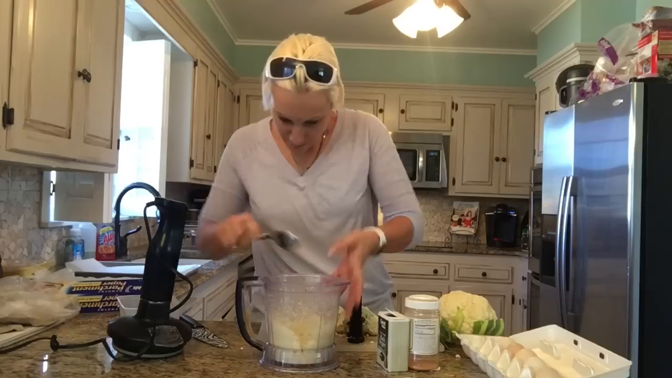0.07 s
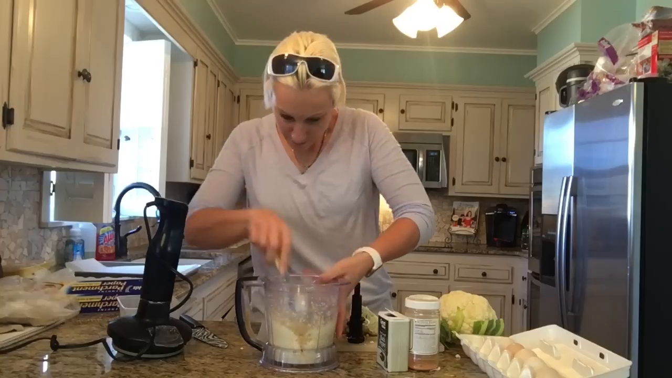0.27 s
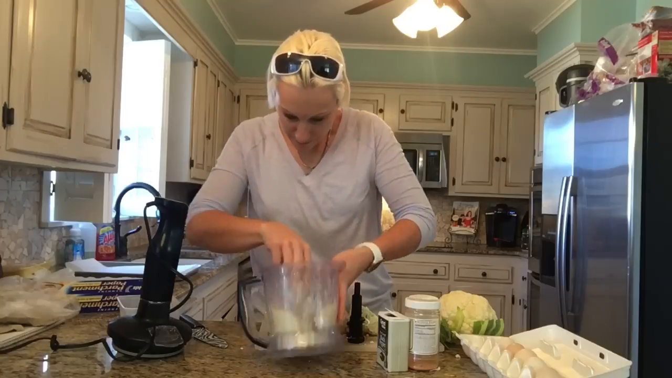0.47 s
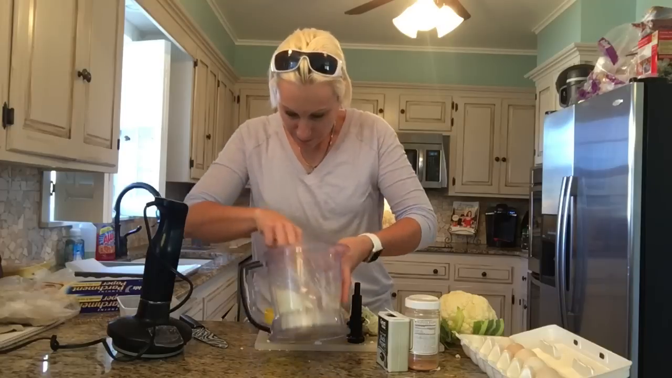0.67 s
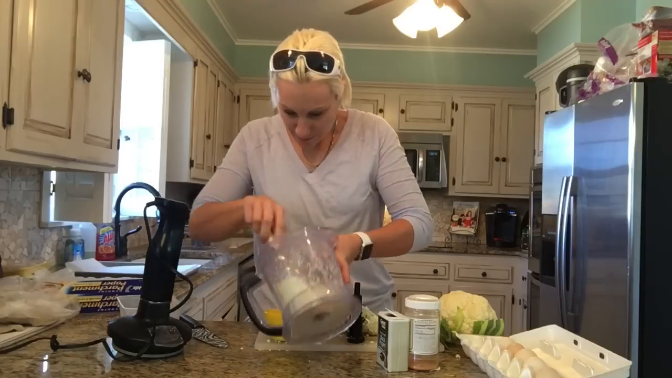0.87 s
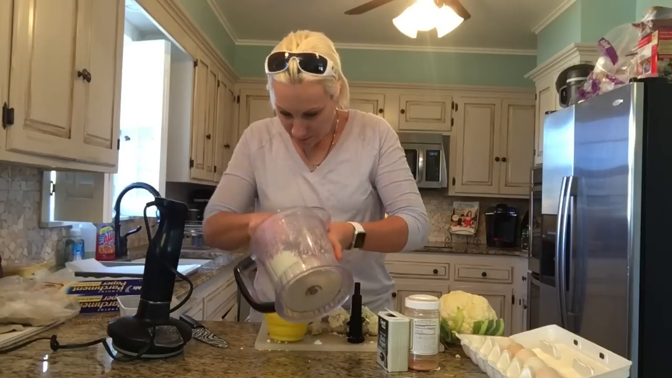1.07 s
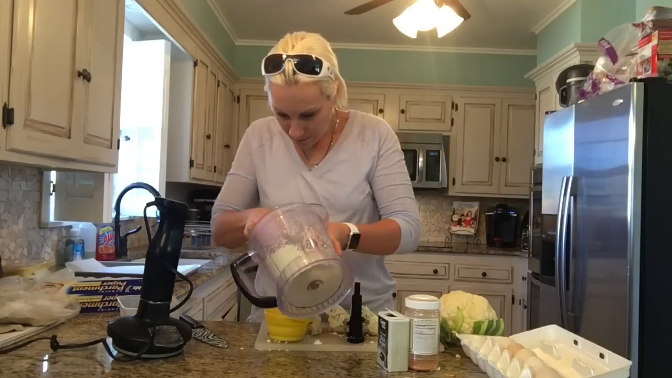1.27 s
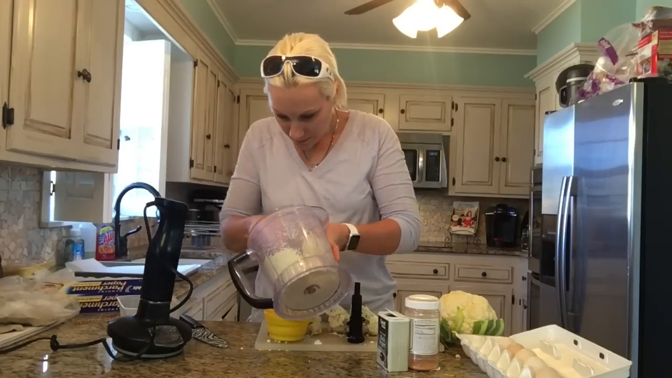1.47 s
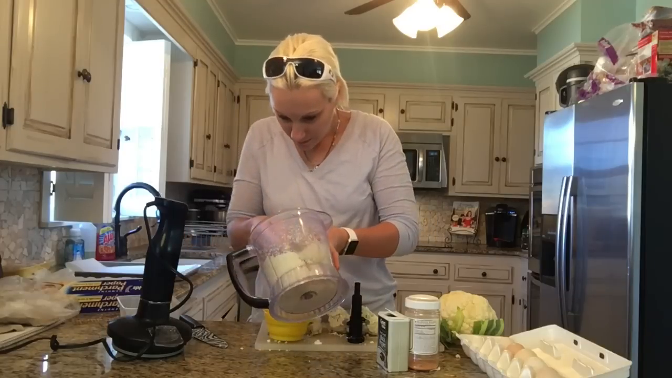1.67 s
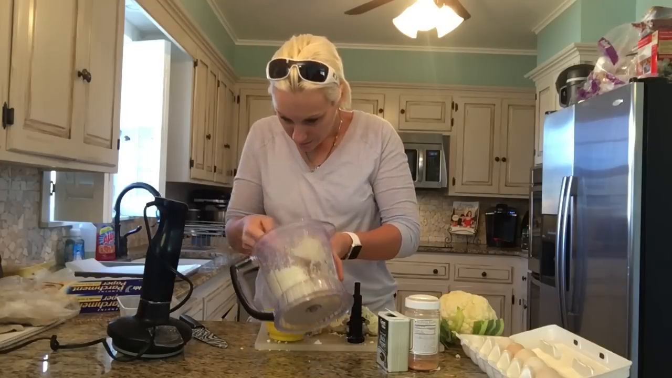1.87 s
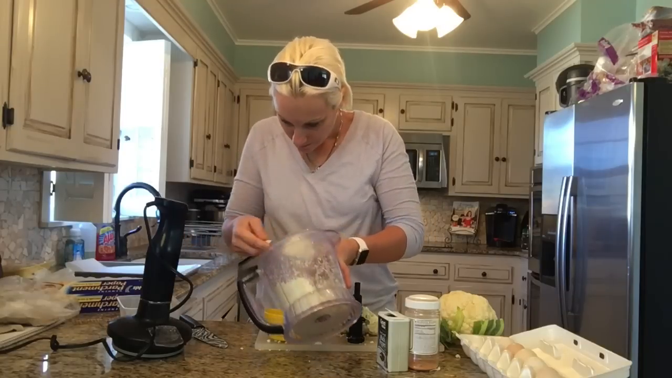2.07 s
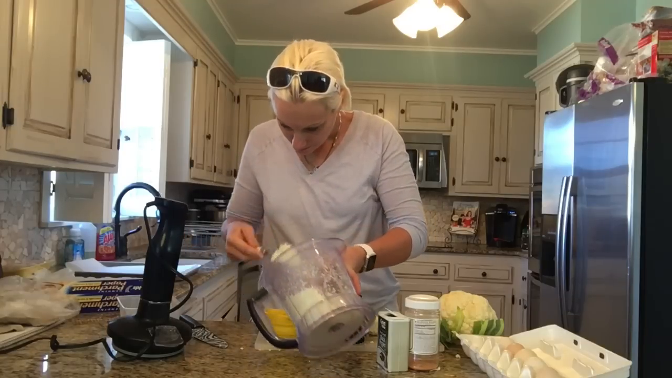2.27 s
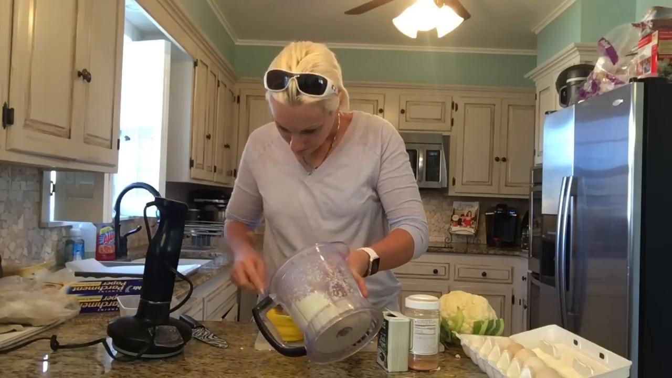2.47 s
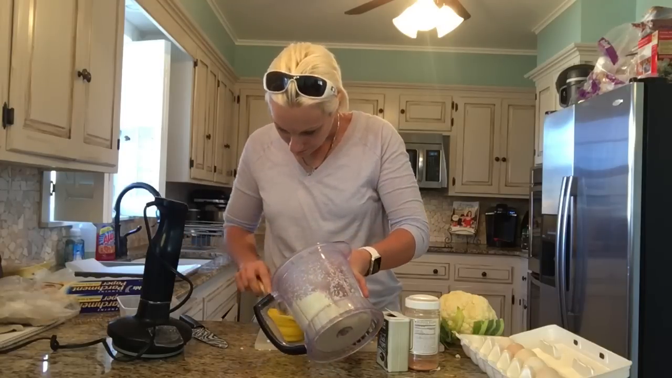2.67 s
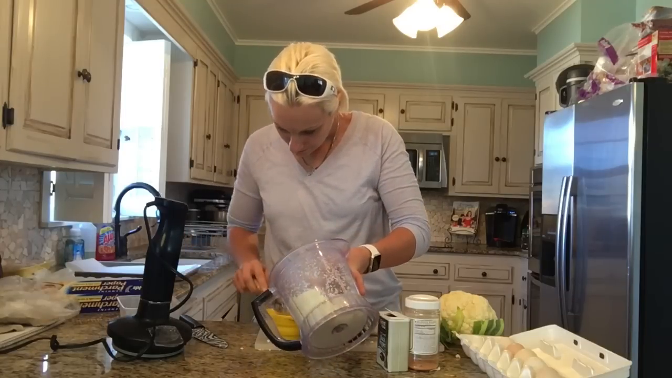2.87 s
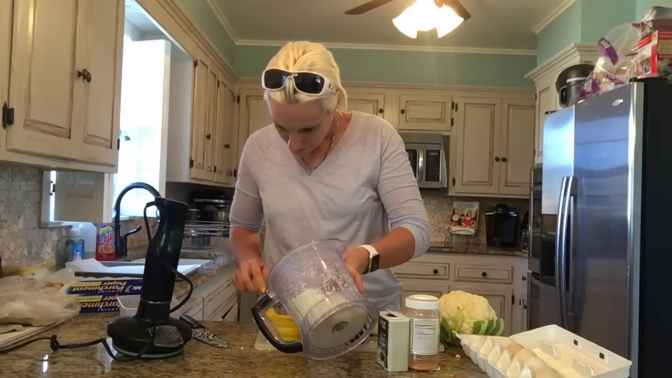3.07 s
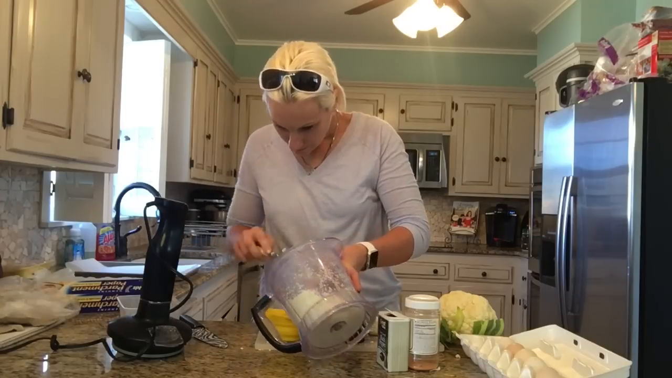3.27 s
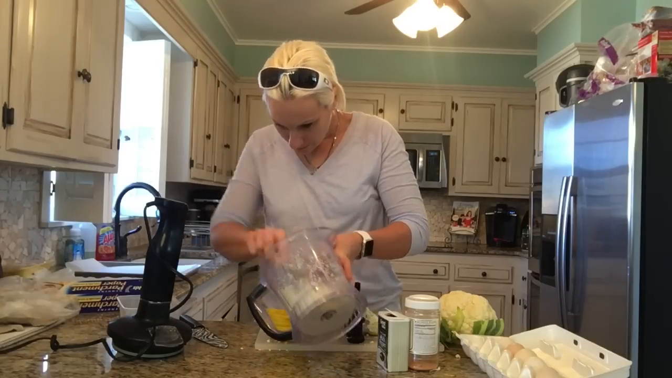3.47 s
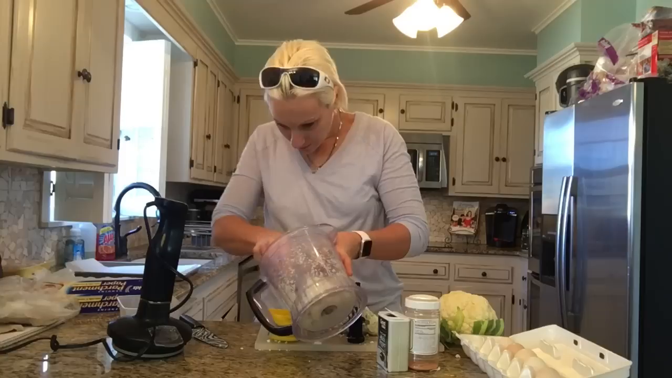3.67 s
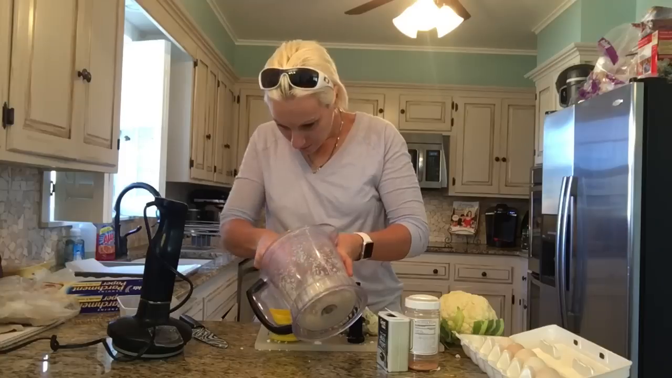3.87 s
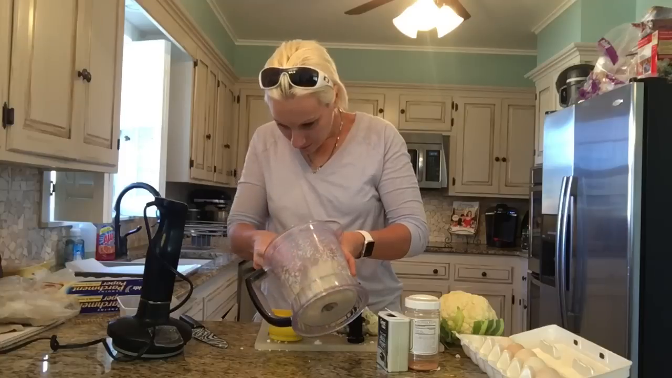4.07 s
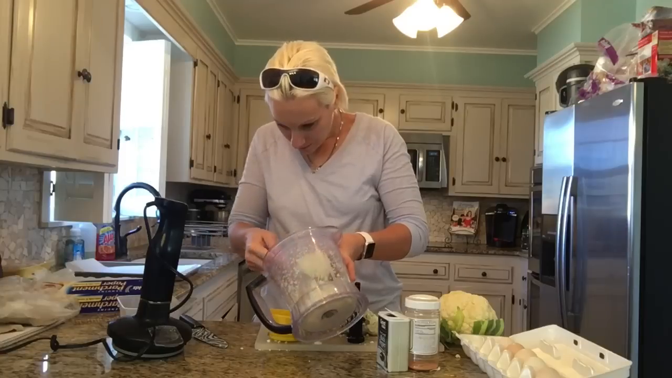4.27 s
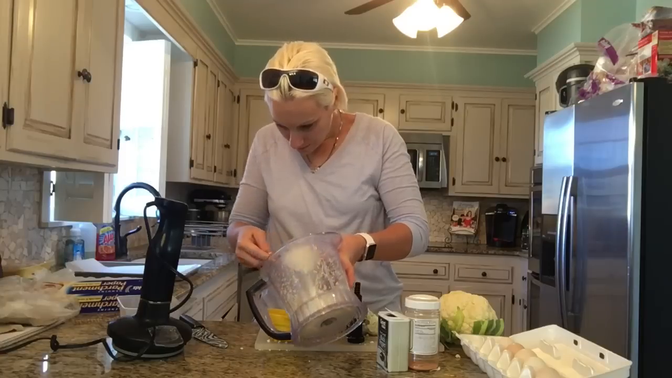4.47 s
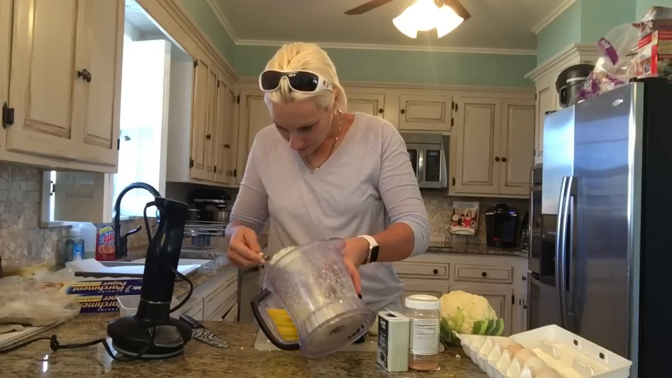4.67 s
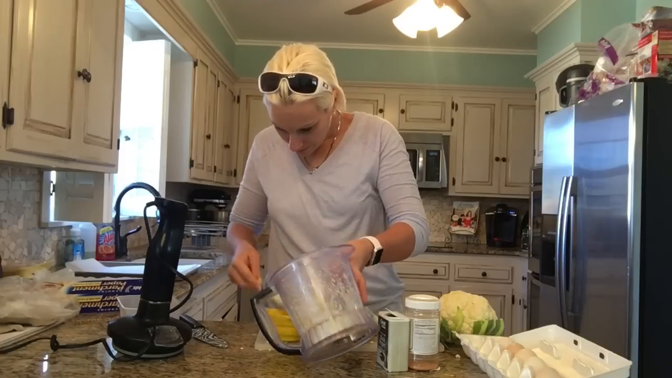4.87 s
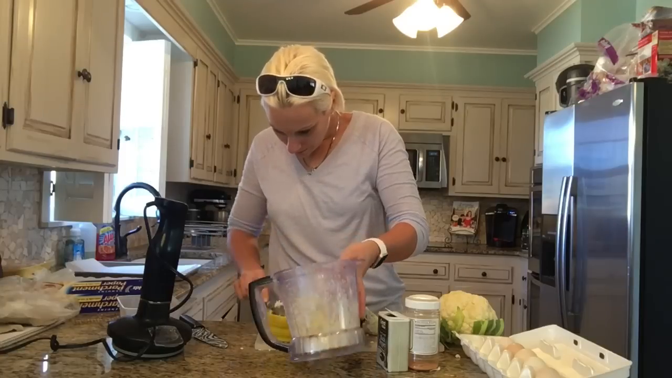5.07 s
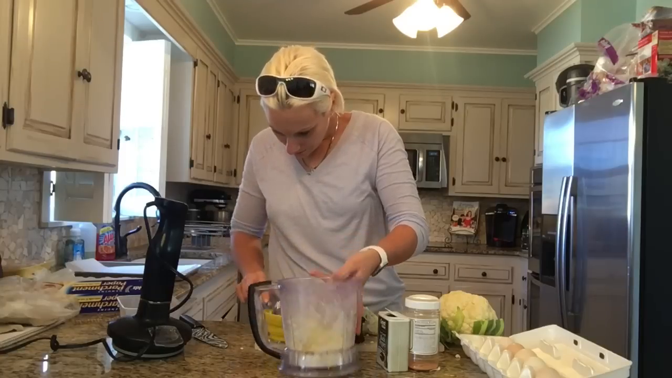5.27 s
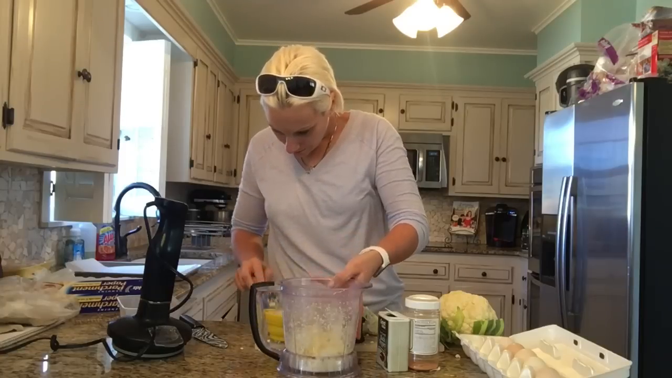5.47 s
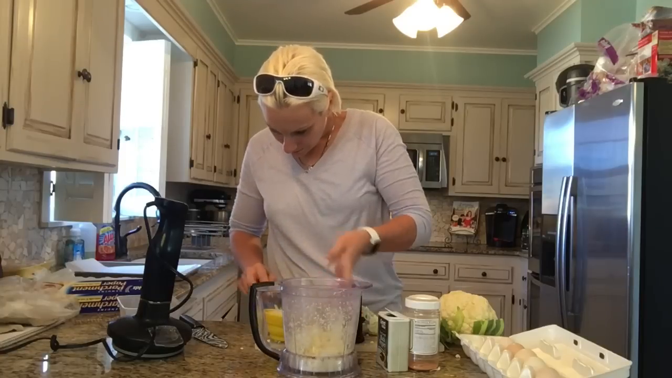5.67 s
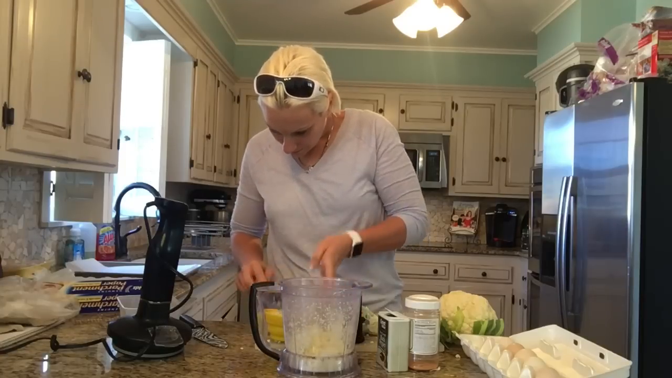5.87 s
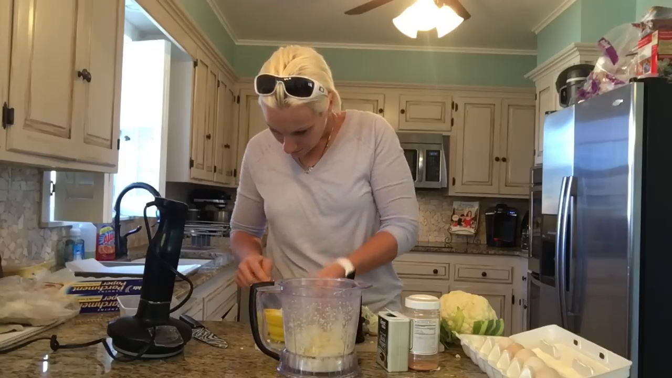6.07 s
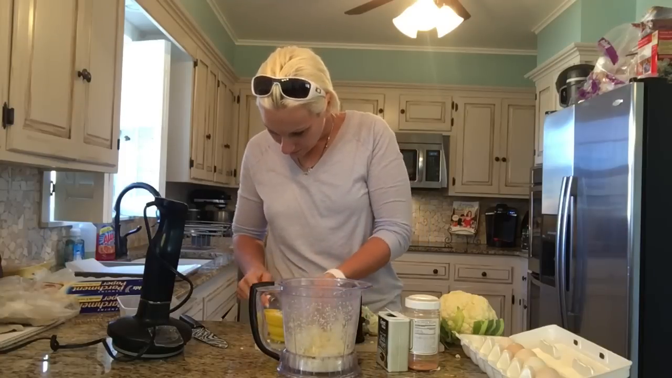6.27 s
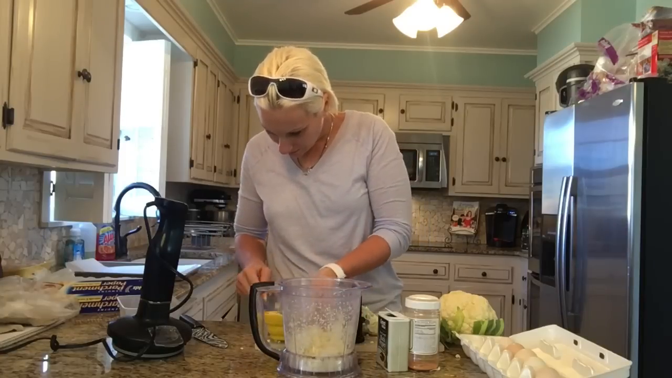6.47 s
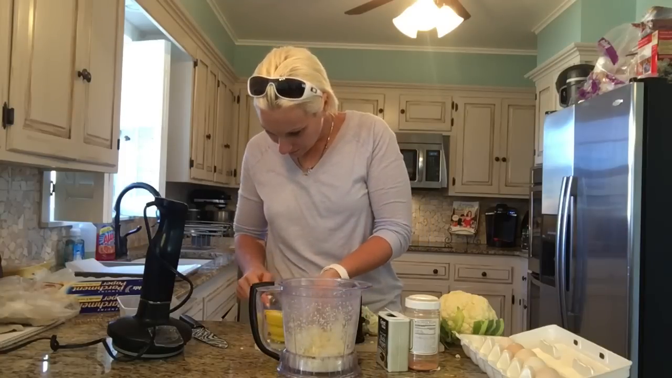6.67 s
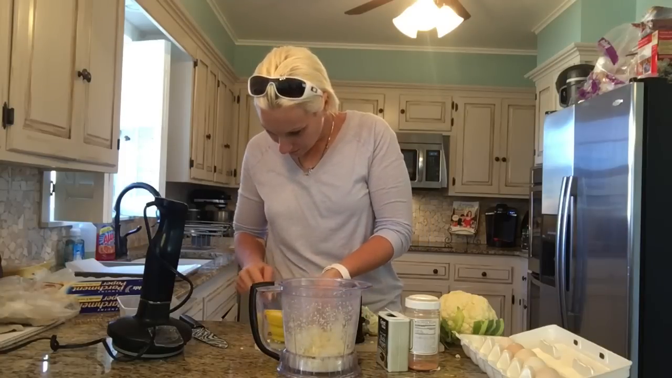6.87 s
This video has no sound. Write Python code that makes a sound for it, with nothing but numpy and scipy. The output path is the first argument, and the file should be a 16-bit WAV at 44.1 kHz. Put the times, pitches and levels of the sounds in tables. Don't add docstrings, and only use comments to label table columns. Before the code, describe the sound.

A quiet home kitchen heard by one microphone across the counter: soft airy room noise, a very low refrigerator hum and a thin, high whine around 1.1 kHz that swells, fades and drifts slightly in pitch throughout. Faint spoon ticks and a light scrape begin at 0.25 s. At 0.44 s the steel spoon knocks the plastic bowl's rim, followed at 0.52 s by a harder, hollow wall knock. A softer rim knock comes at 1.3 s with a small slide. Only sparse, faint touches follow at 1.8, 2.6 and 3 s. Around 3.5 s short grainy scrapes lead to a loud clack at 3.6 s, then little ticks until 4 s. At 5.3 s the bowl lands on stone with a lower, duller thunk, rocking twice within 0.15 s. Each blow is short and damped, with a half-second room tail. One barely audible rub at 6.2 s, then just the background until about 7 s.

```python
import sys
import numpy as np
from scipy import signal
from scipy.fft import rfft, irfft, next_fast_len
from scipy.io import wavfile
from scipy.ndimage import map_coordinates

SR = 44100
rng = np.random.default_rng(int(sys.argv[2]) if len(sys.argv) > 2 else 0)


def natural_amplitude(level_db):
    exponent = np.asarray(level_db, float) / 20
    return 10 ** exponent


def wrap_up_sound(samples):
    columns = np.atleast_2d(samples).T
    tamed = np.clip(columns, -1, 1)
    steps = np.round(tamed * 32767).astype(np.int16)
    wavfile.write(sys.argv[1], SR, steps)


N = 305613

# start in seconds, peak in dB, rise in ms, crack in dB, room answer in dB.
KNOCKS = [
    (0.4376, -6.5, 1.9, -9, -6.5),
    (0.5186, -2.5, 3.1, -9.5, -7),
    (1.307, -12, 1.2, -8.5, -5),
    (3.604, -5, 0.59, -12, -6),
    (5.314, -4.5, 1.8, -12.5, -7.5),
]
# frequency in Hz, width in Hz, level in dB.
RIM_MODES = [(607, 94.6, -34.5), (894, 87, -10), (1247, 120, -17), (1733, 64, 5), (2000, 70, -1.5),
             (2630, 37, -2.5), (3080, 75, -4.5), (3776, 160, -15), (4030, 200, -11.5), (5520, 170, -20.5),
             (6470, 360, -18)]
WALL_MODES = [(400, 65, -14.5), (518, 93, -11), (1045, 59, 5), (1310, 99, -12), (1574, 90, -20),
              (1946, 70, -4), (3420, 70, -13.5), (3597, 67, -12), (4140, 130, -19), (2260, 80, -15.5),
              (5500, 240, -25), (9750, 230, -36)]
TILTED_RIM_MODES = [(414, 90, -18), (602, 91, -19), (840, 290, -12.5), (1595, 68, 0), (2835, 23.5, 1.5),
                    (3836, 270, -6.5), (4200, 230, -8.5), (5240, 160, -11.5), (6630, 300, -20.5)]
TILTED_WALL_MODES = [(386, 56, -10), (516, 85, -10), (1047, 58, 4), (1172, 120, -4), (1610, 97, -5.5),
                     (1840, 104, -14), (2224, 98, 0.5), (2720, 120, -13), (4390, 200, -5.5),
                     (6150, 720, -19)]
BASE_MODES = [(141, 26, -22.5), (354, 27, -11), (530, 48, -0.5), (670, 150, -10), (955, 86, -1.5),
              (1800, 72, -17), (3150, 540, -28), (4210, 250, -30)]
# frequency in Hz, density in dB per Hz.
CRACK_SPECTRA = [
    [(250, -51), (600, -15), (1900, -9), (2400, -17), (3000, -2.5), (4000, -17), (4600, -16), (5300, -13),
     (6600, -16), (8000, -26), (16000, -37)],
    [(200, -58), (400, -19.5), (700, -14.5), (2100, -6), (3100, -13.5), (3650, -11.5), (4800, -19),
     (7000, -19), (8500, -25.5), (16000, -31.5)],
    [(200, -47), (500, -15), (1600, -3), (2300, -6), (2900, -8.5), (4000, -11.5), (4700, -14), (5400, -9.5),
     (6800, -11), (8500, -20.5), (16000, -29)],
    [(150, -59), (400, -21), (750, -19.5), (2100, -1), (2900, -13), (3700, -18.5), (4400, -16), (5200, -21),
     (6100, -15), (7500, -24.5), (16000, -38)],
    [(80, -37), (400, -5), (1300, -9), (1900, -7), (3200, -15), (4200, -18.5), (6500, -28.5), (8000, -34.5),
     (16000, -49)],
]
# start in seconds, peak in dB.
ROCKS = [
    (5.4072, -19.5),
    (5.447, -27),
]
# start in seconds, frequency in Hz, width in Hz, level in dB.
SHADED_MODES = [
    (0.52, 3540, 330, -20),
    (0.52, 1060, 110, -21),
    (3.605, 2170, 170, -24),
]
# start in seconds, peak in dB, pitch in Hz, edge click in dB.
TICKS = [(0.249, -47, 2490, -25), (0.383, -54, 3500, -12), (0.415, -51, 3020, -10), (0.894, -55, 4100, -9),
         (0.997, -53, 4200, -25), (1.080, -46, 3000, -17), (1.279, -41, 1540, -26), (1.298, -37, 3590, -28),
         (1.815, -44, 2500, -22), (2.631, -44, 1630, -30), (2.982, -52, 2000, -30),
         (3.515, -36.5, 1800, -30), (3.568, -46, 4370, -22), (3.826, -41, 2070, -40),
         (3.853, -57, 2830, -18)]
# start in seconds, length in seconds, level in dB, edge hiss in dB.
SLIDES = [(0.3, 0.16, -62, -10.5), (1.177, .08, -60.5, -13), (1.271, 0.047, -49.5, -13),
          (2.605, .1, -68, -24), (2.96, 0.11, -61.5, -22), (3.462, 0.036, -58.5, -12),
          (3.503, 0.042, -49, -11), (3.532, 0.071, -56.5, -3.5), (3.846, 0.026, -47, -16),
          (3.972, 0.096, -63, -16), (6.16, .06, -55.5, -36)]
# frequency in Hz, density in dB per Hz.
RUB_SPECTRUM = [(710, -40), (1200, 8.5), (2320, -3.5), (2610, 7), (3310, -7), (4170, -1.5), (8000, -19),
                (10400, -43.5), (17600, -120)]
EDGE_SPECTRUM = [(3530, -26), (6000, 2.5), (7610, -8), (12800, -9.5), (16000, -19)]
# start in seconds, length in seconds, level in dB, pitch in Hz.
WHINE_SWELLS = [(0.009, 0.088, -46.5, 1074), (0.107, .12, -54.5, 1076), (0.244, 0.055, -48.5, 1077),
                (0.893, 0.077, -53, 1085), (0.965, 0.16, -52, 1078), (1.198, 0.045, -55, 1085),
                (1.412, 0.068, -48, 1079), (1.49, 0.18, -54, 1081), (1.732, 0.09, -56.5, 1089),
                (1.914, 0.19, -59, 1096), (2.097, 0.14, -53.5, 1093), (2.267, 0.21, -55, 1096),
                (2.503, 0.11, -54, 1103), (2.599, 0.091, -49.5, 1108), (2.978, 0.088, -52.5, 1101),
                (3.102, 0.17, -55, 1093), (3.347, 0.11, -57.5, 1085), (3.52, .08, -58, 1089),
                (3.941, 0.052, -52.5, 1081), (4.053, 0.13, -50, 1076), (4.204, 0.23, -54, 1080),
                (4.502, 0.11, -48, 1080), (4.616, 0.37, -51.5, 1075), (5.045, 0.27, -51, 1080),
                (5.578, 0.069, -51.5, 1075), (5.71, 0.26, -51.5, 1074), (5.973, 0.097, -58, 1084),
                (6.075, .23, -50, 1081), (6.441, 0.17, -55, 1088), (6.772, 0.11, -51.5, 1100)]
# frequency in Hz, level in dB, width in Hz.
HUM_TONES = [(48.7, -66.5, 16), (72.3, -65, 2.1), (120.5, -66, 6), (250, -72, 4.11)]
# frequency in Hz, density in dB per Hz.
AIR_SPECTRUM = [(24, -38), (40, -17), (60, -10.5), (150, -15), (260, -12.5), (400, -20.5), (600, -17),
                (860, -17.5), (1050, -10.5), (1350, -18.5), (2600, -23), (3200, -28), (4400, -30),
                (5000, -33), (7000, -41.5), (7800, -48), (10300, -51.5), (15800, -54)]
# frequency in Hz, 60 dB decay time in seconds, level in dB.
KITCHEN_DECAY = [(150, 0.514, 6.5), (483, 0.51, -0.5), (1310, 0.59, -5.5), (3380, 0.54, -1),
                 (7100, 0.42, -3), (9920, 0.34, -5), (15280, 0.39, -5.5)]
# frequency in Hz, gain in dB.
HOUSING_RESPONSE = [(4500, 0), (4900, -2.5), (5400, 0.5), (9800, 1.5), (10300, -4), (10900, -0.5)]

HOLD_MS, HOLD_MS_PER_DB = 6.8, 0.7
SLOW_MODE_HZ = 350
PRESS_S, LIFT_S, MID_STROKE_DB = 0.008, 0.015, 1
SWELL_EDGE_S, BETWEEN_SWELLS_DB, WHINE_DB = 0.023, -62.5, -0.5
AIR_DB = -53.5
TOP_HZ = 15950


def unit(x):
    return x / np.sqrt(np.mean(x ** 2) + 1e-20)


def along(hz, points, axis=1):
    rows = np.transpose(points)
    return np.interp(np.log(hz + 1), np.log(rows[0] + 1), rows[axis])


def coloured(size, spectrum):
    m = next_fast_len(size + 2048)
    gain = natural_amplitude(along(np.fft.rfftfreq(m, 1 / SR), spectrum))
    return unit(irfft(rfft(rng.standard_normal(m)) * gain, m)[:size])


def wobble(rate_hz):
    knots = rng.standard_normal(int(N * rate_hz / SR) + 4)
    return map_coordinates(knots, [np.arange(N) * rate_hz / SR])


def add(track, start_s, sound):
    part = track[round(start_s * SR):][:len(sound)]
    part += sound[:len(part)]


def knock(rings, crack, rise_ms, hold_ms, crack_db):
    t = np.arange(SR // 12) / SR
    hz, width_hz, db = np.transpose(rings)[..., None]
    phase = 2 * np.pi * (hz * t + rng.random(hz.shape))
    modes = natural_amplitude(db) * width_hz / 100 * np.exp(-np.pi * 0.6 * width_hz * t) * np.sin(phase)
    build_ms = rise_ms * (1000 / hz) ** 0.73
    swell = (1 - np.exp(-1000 * t / build_ms)) ** 2
    choke_ms = hold_ms * np.maximum(1, SLOW_MODE_HZ / hz)
    modes *= swell / (1 + (1000 * t / choke_ms) ** 4)
    modes /= np.abs(modes.sum(0)).max()

    snap = natural_amplitude(crack_db) * coloured(len(t), crack)
    snap *= (1 - np.exp(-t / 0.00087)) * natural_amplitude(-60 * t / 0.042)
    crack_gain = natural_amplitude(along(np.fft.rfftfreq(len(t), 1 / SR), crack))
    blur = np.roll(irfft(crack_gain, len(t)), SR // 200)
    blur *= natural_amplitude(1.5) * np.linalg.norm(snap) / np.linalg.norm(blur)

    direct = modes.sum(0) + snap
    spread = (modes / (1 + (hz / 4000) ** 2)).sum(0) + blur
    return np.array([direct, spread]) / np.abs(direct).max()


def bowl():
    out = np.zeros(N)
    mode_sets = RIM_MODES, WALL_MODES, TILTED_RIM_MODES, TILTED_WALL_MODES, BASE_MODES
    for row, rings, crack in zip(KNOCKS, mode_sets, CRACK_SPECTRA):
        start_s, db, rise_ms, crack_db, room_db = row
        hold_ms = HOLD_MS - HOLD_MS_PER_DB * db
        direct, spread = knock(rings, crack, rise_ms, hold_ms, crack_db)
        add(out, start_s, natural_amplitude(db) * direct)
        add(out, start_s, natural_amplitude(db + room_db) * kitchen(spread))
    for start_s, db in ROCKS:
        direct, spread = knock(BASE_MODES, CRACK_SPECTRA[-1], rise_ms=1.5, hold_ms=11, crack_db=-13)
        add(out, start_s, natural_amplitude(db) * direct)
        add(out, start_s, natural_amplitude(db - 5.0) * kitchen(spread))
    return out


def shaded():
    out, t = np.zeros(N), np.arange(SR // 20) / SR
    for start_s, hz, width_hz, db in SHADED_MODES:
        u = np.pi * width_hz * t
        ring = np.sin(2 * np.pi * hz * t) * u ** 2 * np.exp(2 - 2 * u)
        add(out, start_s, natural_amplitude(db) * kitchen(ring))
    return out


def ticks():
    out, t = np.zeros(N), np.arange(SR // 30) / SR
    for start_s, db, hz, edge_db in TICKS:
        ring = np.sin(2 * np.pi * hz * t) * natural_amplitude(-60 * t / 0.02) * (1 - np.exp(-t / 0.001))
        click = 0.5 * coloured(len(t), RUB_SPECTRUM) + natural_amplitude(edge_db) * coloured(len(t), EDGE_SPECTRUM)
        click *= (1 - np.exp(-t / 0.00119)) * natural_amplitude(-60 * t / 0.034)
        add(out, start_s, natural_amplitude(db) * (ring + click))
    return out


def slides():
    out, t = np.zeros(N), np.arange(N) / SR
    grain = natural_amplitude(1.76 * wobble(320))
    rub = unit(grain * coloured(N, RUB_SPECTRUM))
    edge = unit(grain * coloured(N, EDGE_SPECTRUM))
    for start_s, length_s, db, edge_db in SLIDES:
        since_s, left_s = t - start_s, start_s + length_s - t
        touch = np.clip(np.minimum(since_s / PRESS_S, left_s / LIFT_S), 0, 1)
        speed = np.sin(np.pi * np.clip(since_s / length_s, 0, 1))
        out += touch * natural_amplitude(db + MID_STROKE_DB * (speed - 2)) * (rub + natural_amplitude(edge_db) * edge)
    return out


def kitchen(x):
    hz, t, z = signal.stft(rng.standard_normal(SR * 3 // 4), SR, nperseg=256)
    t60_s = along(hz, KITCHEN_DECAY)[:, None]
    level_db = along(hz, KITCHEN_DECAY, axis=2)[:, None]
    tail = signal.istft(z * natural_amplitude(level_db - 60 * t / t60_s), SR, nperseg=256)[1]
    tail *= np.clip((np.arange(len(tail)) / SR - 0.003) / 0.0022, 0, 1)
    return signal.fftconvolve(x, tail / np.linalg.norm(tail))


def fridge():
    start_s, length_s, db, hz = np.transpose(WHINE_SWELLS)[..., None]
    t = np.arange(N) / SR
    pitch_hz = np.interp(t, (start_s + length_s / 2)[:, 0], hz[:, 0]) + 2.35 * wobble(30)
    inside_s = np.minimum(t - start_s, start_s + length_s - t)
    on = np.clip(0.5 + inside_s / SWELL_EDGE_S, 0, 1)
    level = np.maximum(natural_amplitude(BETWEEN_SWELLS_DB), (on * natural_amplitude(db + WHINE_DB)).sum(0))
    flutter = natural_amplitude(1.7 * wobble(25) + 0.34 * wobble(8))
    whine = level * flutter * np.sin(2 * np.pi * np.cumsum(pitch_hz) / SR)
    hum = np.zeros(N)
    for tone_hz, tone_db, width_hz in HUM_TONES:
        waver = 1 + 0.36 * wobble(width_hz)
        hum += natural_amplitude(tone_db) * waver * np.sin(2 * np.pi * tone_hz * t + 0.82 * wobble(width_hz))
    return np.sqrt(2) * (whine + hum)


def air():
    return natural_amplitude(AIR_DB + 0.14 * wobble(3.3)) * coloured(N, AIR_SPECTRUM)


def scene():
    small = ticks() + slides()
    small_room = natural_amplitude(-3.0) * kitchen(small)[:N]
    return (bowl() + shaded() + small + small_room + fridge() + air())[None]


def top_cut(x):
    return signal.sosfilt(signal.butter(12, 16510, fs=SR, output="sos"), x)


def record(dry):
    hz = np.fft.rfftfreq(N, 1 / SR)
    band = np.clip((TOP_HZ - hz) / 250, 0, 1)
    mix = irfft(rfft(dry) * band * natural_amplitude(along(hz, HOUSING_RESPONSE)), N)
    return top_cut(mix)


dry = scene()
out = record(dry)
wrap_up_sound(out)
```